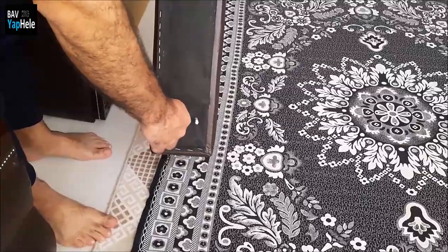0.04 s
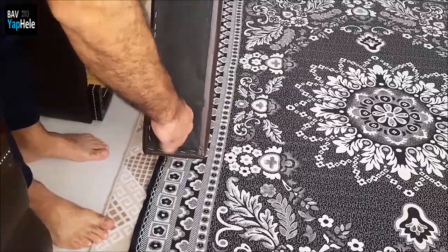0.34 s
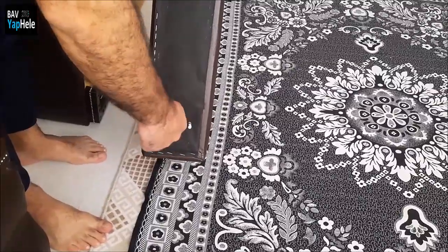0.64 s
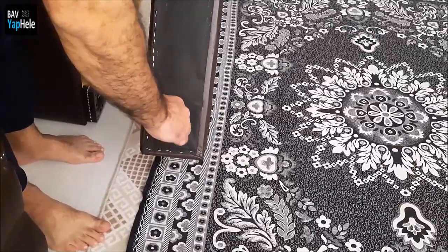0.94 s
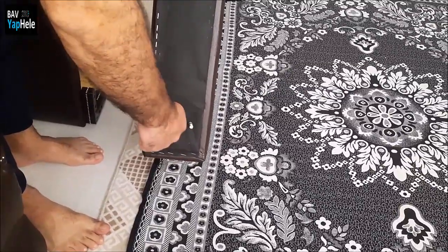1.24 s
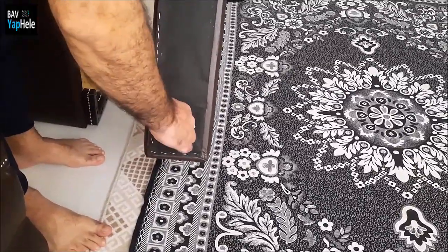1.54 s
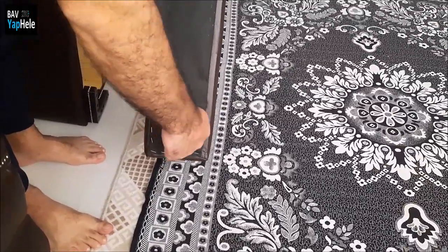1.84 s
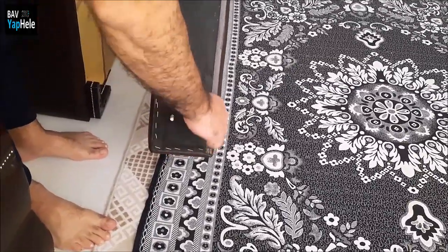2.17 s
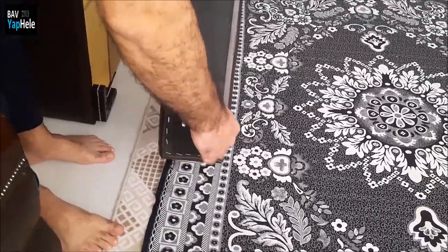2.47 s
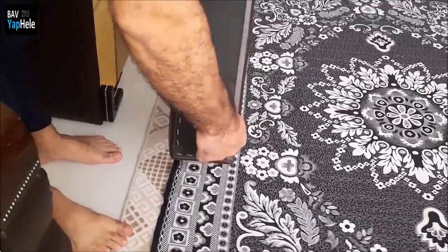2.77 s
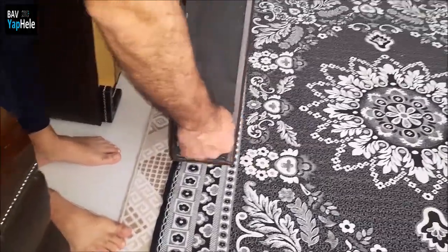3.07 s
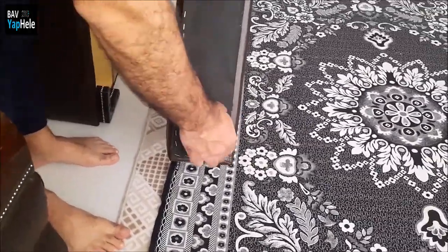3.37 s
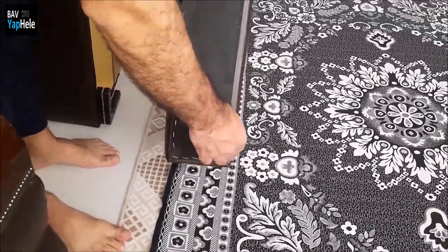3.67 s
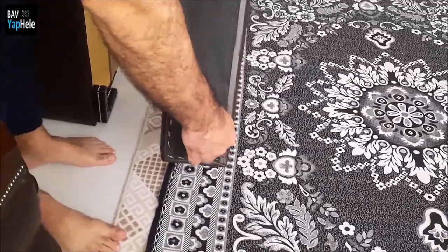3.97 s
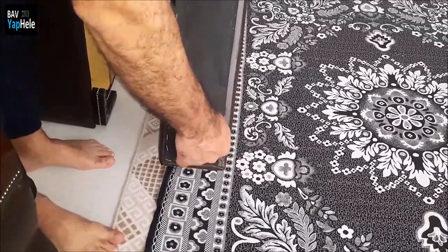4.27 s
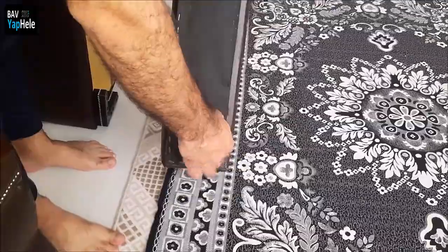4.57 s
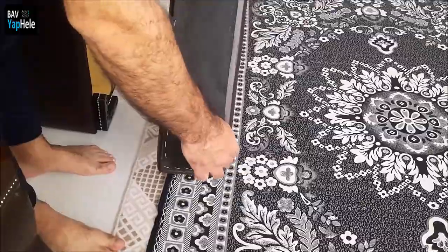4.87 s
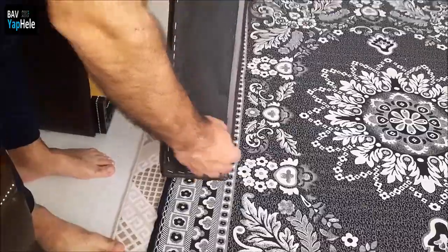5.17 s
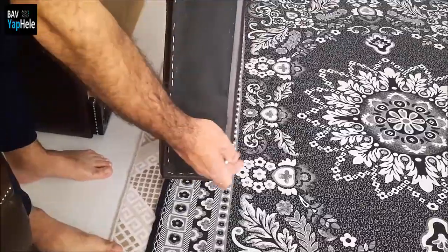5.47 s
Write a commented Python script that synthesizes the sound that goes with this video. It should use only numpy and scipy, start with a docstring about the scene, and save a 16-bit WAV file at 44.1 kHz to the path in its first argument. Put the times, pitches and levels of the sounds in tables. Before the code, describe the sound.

A detachable sofa arm is tugged loose by hand, heard from about a metre away in a small room with little echo. Light clicks and rubbing start sparsely, then build into uneven clusters of rattling clicks, short scrapes and brief hollow creaks. The sharpest knock comes just past the middle, and cushioned thuds sound as weight shifts on the frame. Quiet room air lies underneath.

```python
"""In a small living room, about a metre away, a detachable sofa arm is rocked and pulled loose by hand.
Its fittings click and chatter on impact and scrape in their slots by sliding friction. At each slip,
stick-slip motion makes the hollow panel groan and its body rub; shifting weight excites the frame's
low modes as thuds. The room reverberates for under half a second over quiet air and a faint hiss."""
import sys
import numpy as np
from scipy import signal
from scipy.fft import rfft, irfft
from scipy.io import wavfile
from scipy.ndimage import uniform_filter1d

SR = 44100
rng = np.random.default_rng(int(sys.argv[2]) if len(sys.argv) > 2 else 0)


def master_out(mix):
    """Clip the mix to full scale and print it as 16-bit PCM to the path in sys.argv[1]."""
    frames = np.transpose(np.atleast_2d(mix))
    ceiling = np.clip(frames, -1, 1)
    pcm = np.round(ceiling * 32767).astype(np.int16)
    wavfile.write(sys.argv[1], SR, pcm)


N = 247401
SIZE, TEN_MS = 8192, SR / 100  # samples in a short response; samples over which a blow's level is set

# A fitting lets go and catches again: (time [s], relative click level [dB], contact resonance [Hz],
# low-mid gain [dB], treble gain [dB], chatter decay [ms], relative groan level [dB])
SLIPS = [ (0.187, -62, 5070, -22, -3.5, 0.25, -70), (0.461, -46, 1800, -8, -6, 3.5, -39),
         (0.478, -43, 3400, -17, -7.5, 12, -47.5), (0.502, -45, 3200, -41, -5, 6, -72),
         (0.543, -54, 1290, 8, 1, 2.7, -37.5), (0.572, -42, 3330, 5, -5.5, 0.7, -43.5),
         (1.062, -61, 2400, -12, -6, 6.4, -50.5), (1.187, -74, 1000, -13, -6, 15, -54),
         (1.661, -57, 3280, -10, -20, 2.7, -42), (1.771, -84, 1000, -4, -12, 9.6, -56.5),
         (2.137, -49.5, 3600, 11, -3.5, 2.06, -42.5), (2.2559, -29, 1580, -1.5, -2.5, 5.5, -41),
         (2.4701, -30.5, 5750, -12.5, -2, 2.7, -44), (2.596, -33, 2210, -25, 1, 4.64, -38.5),
         (2.62, -32, 2840, -13, -5, 11.4, -68), (2.816, -46, 950, -3.5, -23, 6.8, -77),
         (2.861, -47.5, 990, 10.5, -5, 4, -49), (2.986, -32, 1790, -8.5, -10.5, 4.5, -44.5),
         (3.021, -31.5, 4630, 2.5, -4, 5, -40.5), (3.21, -44.5, 990, 13, -8, 3.96, -35.5),
         (3.254, -53, 910, 8, -3, 3.5, -45.5), (3.334, -25, 2170, 1.5, -2.5, 2.45, -33.5),
         (3.3745, -18.5, 1020, 0, -1.5, 4.7, -27.5), (3.613, -47.5, 910, 14, -4.5, 9.2, -41.5),
         (3.778, -41.5, 2300, 18, 4.5, 1.6, -42), (3.831, -46.5, 874, 24, 4.5, 11, -52),
         (3.860, -32, 4400, -3, -6, 8.9, -43.5), (3.927, -38.5, 3500, 16, 2, 1.83, -40),
         (4.091, -40, 945, 11, -2, 4.84, -32.5), (4.138, -71, 950, -2, -11, 13.98, -35),
         (4.171, -32, 2260, 6.5, -3, 10.2, -33.5), (4.183, -30.5, 2340, -30, -4.5, 6.35, -36),
         (4.401, -48, 2120, 14, 1, 3.6, -44), (4.427, -43, 960, 4.5, -8.5, 8.5, -51),
         (4.511, -29, 2140, -4, -7, 13, -39.5), (4.5242, -22.5, 1640, -5, -2, 6.6, -35),
         (4.676, -45, 2060, 9.5, -5.5, 12, -55), (4.7949, -30, 4400, 2, -5, 5.7, -31.5),
         (4.8146, -29, 4000, -2, -4.5, 9.5, -61), (4.910, -31, 1540, 12.5, -3.5, 3.3, -31),
         (4.9305, -29.5, 4400, 4, 1, 2.1, -62), (5.0502, -30, 1340, 4, -10.5, 7.5, -38),
         (5.147, -48, 3690, -8, 3.5, 3.45, -85), (5.3111, -34, 1990, -1.5, 5, 0.083, -74),
         (5.3521, -33, 2000, 2.5, 0.5, 0.083, -72), (5.406, -33.5, 1410, 5, -2, 0.18, -69)]


def clicks(chatter_per_ms=1.16, spot_db=6.5, spot_width=1.41):
    """Impact and rebound: one sharp contact and a dying chatter, coloured by the spot's resonance."""
    out, t = np.zeros(N), np.arange(SIZE // 2) / SR
    for s, db, hz, low_db, treble_db, chatter_ms, _ in SLIPS:
        chatter = unit(grit(len(t), spread_db=1) * np.exp(-1000 * t / chatter_ms))
        blow = chatter * chatter_per_ms * chatter_ms  # a longer chatter outweighs the first contact
        blow[0] += 1
        blow = colour(unit(blow), [(550, low_db), (1400, 0), (2400, 0), (5500, treble_db)])
        blow = colour(blow, [(hz / spot_width, 0), (hz, spot_db), (hz * spot_width, 0)])
        add(out, s, fitting(blow) * undb(db) * np.sqrt(TEN_MS))
    return out


def fitting(force):
    """Linear response: the force is convolved with the contact's crack and the panel's ringing."""
    # Modes of the panel and its fittings: (frequency [Hz], t60 [s], level [dB])
    modes = [(447.4, 0.08, -17.5), (570, 0.19, -19.5), (690, 0.2, -18), (801.2, 0.072, -10),
             (951.4, 0.063, -8), (1103, 0.11, -22.5), (1324, 0.029, -27), (1451, 0.11, -22.5),
             (1702, 0.0091, -13), (2127, 0.01, -13.5), (3166, 0.027, -25), (3500, 0.013, -25),
             (4400, 0.024, -32), (5500, 0.013, -32)]
    # Spectrum of one contact: (frequency [Hz], spectral level [dB])
    contact = [(60, -35), (200, -20.5), (400, -14), (700, 0), (1300, 3), (2100, -4.5), (2700, -7.5),
               (4200, -3.5), (6300, -8.5), (9500, -19.5), (13000, -18), (16000, -24.5)]
    ringing = ring(modes, scatter_db=3.5)  # the modes' shares vary with where the force acts
    crack = unit(colour(signal.unit_impulse(SIZE), contact))
    return signal.fftconvolve(force, unit(ringing + crack))


def scrapes(catch_db=-0.5, catch_hz=260):
    """Sliding friction: tiny slips swell and fade; the surfaces catch unevenly every few milliseconds."""
    # Longer pushes along the slot: (peak time [s], rise [s], fall [s], level [dB], treble gain [dB])
    pushes = [ (0.22, 0.091, 0.21, -75.5, -7), (0.57, 0.023, 0.011, -50.5, -9),
              (1.062, 0.021, 0.017, -69.5, -4.5), (2.14, 0.014, 0.05, -48.5, -4.5),
              (2.599, 0.029, 0.0098, -38.5, -4.5), (2.99, 0.012, 0.051, -43.5, -6),
              (3.364, 0.023, 0.0071, -34, -4), (3.761, 0.031, 0.2, -53.5, -9.5),
              (4.10, 0.041, 0.11, -49, -9), (4.186, 0.0087, 0.015, -32.5, -5.5),
              (4.932, 0.013, 0.013, -30, -1)]
    out = np.zeros(N)
    for s, rise, fall, db, treble_db in list(pushes) + slides():
        t = np.arange(-2 * rise, 2 * fall, 1 / SR)[:SR // 2]
        catches = np.interp((t - t[0]) * catch_hz, np.arange(SIZE), rng.standard_normal(SIZE))
        friction = grit(SR // 2, spread_db=6)[:len(t)] * swell(t, rise, fall)
        friction *= undb(catch_db * (catches + 1))
        force = colour(friction, [(2000, 0), (6000, treble_db)])
        add(out, s + t[0], fitting(force) * undb(db))
    return out


def slides(lag_s=0.011, rise_s=0.014, fall_s=0.1, slide_db=-17, loose_ms=1):
    """Play in a joint: a fitting slides around each click, more when loose. Gives rows for scrapes()."""
    rows = []
    for s, db, _, _, treble_db, chatter_ms, _ in SLIPS:
        looseness_db = 20 * np.log10(chatter_ms / (chatter_ms + loose_ms))
        rows.append((s + lag_s, rise_s, fall_s, db + slide_db + looseness_db, treble_db / 2 - 9.5))
    return rows


def groans(count=4, lag_ms=1.823, detune=0.0376, stutter_s=0.047, stutter_db=-8.5, gap_scatter=0.18):
    """Stick-slip: each slip sets the panel groaning, longer for a longer chatter, in a fading stutter."""
    # The panel's note, which shifts with the grip: (time [s], frequency [Hz])
    panel_pitch = [(2.6, 570), (2.98, 553.3), (3.04, 480), (3.13, 554.7), (4.4, 534.3), (4.66, 576.7),
                   (4.81, 526.2), (5.1, 583)]
    out = np.zeros(N)
    for s, *_, chatter_ms, db in SLIPS:
        half_ms = 7.574 + 0.543 * chatter_ms
        peak_s = s + (lag_ms + half_ms) / 1000
        for k, (late, sharp) in enumerate(rng.standard_normal((count, 2))):
            hz = np.interp(peak_s, *np.transpose(panel_pitch)) * (1 + detune * sharp)
            add(out, peak_s - SIZE / 2 / SR, groan(hz, half_ms) * undb(db + k * stutter_db))
            peak_s += stutter_s * (1 + gap_scatter * late)
    return out


def groan(hz, half_ms, waver=0.069, rough=0.15, skew=0.09, overtone_db=-30):
    """Friction-driven oscillation: an unsteady burst near the panel's resonance, peaking mid-way."""
    t = np.arange(-SIZE // 2, SIZE // 2) / SR
    drift, grip = signal.resample(rng.standard_normal((2, SIZE // 128)), SIZE, axis=1)
    phase = 2 * np.pi * np.cumsum(hz * (1 + waver * drift)) / SR
    tone = np.sin(phase) + undb(overtone_db) * np.sin(2 * phase)
    width_s = half_ms / 1000 * (1.024 + skew * np.sign(t))
    envelope = np.exp(-0.5 * (t / width_s) ** 2)
    return np.sqrt(2) * envelope * (1 + rough * grip) * tone


def thuds(push_s=0.008):
    """Cushioned impact: padded blows ring the heavy frame; the softer the contact, the deeper the note."""
    # Weight dropping onto the frame: (time [s], relative level [dB], peak of the force spectrum [Hz])
    blows = [(0.46, -52, 383), (0.56, -52, 111), (2.26, -57, 130), (2.602, -59.5, 130), (3.37, -46, 105),
             (3.858, -56.5, 88), (4.525, -57, 120), (4.801, -47.5, 300), (5.403, -45, 270),
             (5.412, -46, 155)]
    # The frame's low modes: (frequency [Hz], t60 [s], level [dB])
    frame_modes = [(72.6, 0.22, -15), (127, 0.12, 0), (255, .04, 1), (335, 0.07, -9)]
    out, t = np.zeros(N), np.arange(SIZE) / SR
    for s, db, hz in blows:
        push = rng.standard_normal(SIZE) * t * np.exp(-t / push_s)
        push = colour(push, [(hz / 3, -12), (hz, 0), (hz * 2, -10), (hz * 10, -40)])
        thud = unit(signal.fftconvolve(push, ring(frame_modes)))
        add(out, s, thud * undb(db) * np.sqrt(TEN_MS))
    return out


def drag(drag_db=-21, rise_s=0.014, fall_s=0.094):
    """Friction noise: the hollow body rubs on the frame at each slip; incoherent rubs add in power."""
    # Spectrum of the rubbed hollow body: (frequency [Hz], spectral level [dB])
    hollow = [(35, -16), (65, -4.5), (130, -5.5), (190, -10), (400, -1), (650, -2), (1000, -22.5),
              (3000, -43.5)]
    power, t = np.zeros(N), np.arange(-SIZE // 2, SIZE) / SR
    for s, *_, groan_db in SLIPS:
        rub = undb(groan_db + drag_db) * swell(t, rise_s, fall_s)
        add(power, s + rise_s + t[0], rub ** 2)
    return unit(colour(grit(N, spread_db=0), hollow)) * np.sqrt(N * power)


def room(wet_db=1.5, build_s=0.0027, near_db=-8, near_s=0.0023, bass_db=-3):
    """Reverberation: left and right responses of direct sound, early scatter and a diffuse tail."""
    # The room's decay by band: (frequency [Hz], t60 [s])
    decay = [(150, 0.23), (600, 0.26), (2000, 0.22), (5000, 0.23), (13000, 0.16)]
    count = SR * 2 // 3
    t, hz = np.arange(count) / SR, np.fft.rfftfreq(count, 1 / SR)
    noise, tail = rfft(diffuse(count)), 0
    for centre, t60 in decay:
        band = read([(f, float(f == centre)) for f, _ in decay], hz)
        tail = tail + irfft(noise * band, count) * np.exp(-np.log(1000) * t / t60)
    tail = unit(tail * (1 - np.exp(-t / build_s))) * undb(wet_db)
    near = unit(diffuse(count) * np.exp(-t / near_s)) * undb(near_db)  # off the floor and the arm
    response = np.array([colour(late, [(600, bass_db), (1500, 0)]) + colour(early, [(1000, 4), (6000, 5)])
                         for late, early in zip(tail, near)])
    response[0, 0] += 1
    response[1, 2] += 1  # the direct sound reaches the right two samples later
    return [even(path) for path in response]


def even(path, narrow_bins=24, wide_bins=900):
    """Equalisation: levels the noise-built response's chance peaks and dips, for an even colour."""
    power = np.abs(rfft(path)) ** 2
    ripple = uniform_filter1d(power, narrow_bins) / uniform_filter1d(power, wide_bins)
    hz = np.fft.rfftfreq(len(path), 1 / SR)
    return colour(path, np.c_[hz + 1, -10 * np.log10(ripple)])


def background(air_db=-67):
    """Diffuse ambient noise: quiet room air, with a faint high hiss for a while."""
    # Spectrum of the room air: (frequency [Hz], spectral level [dB])
    air_spectrum = [(15, -53), (25, -10), (114, -4.5), (242, -12.5), (293, -7.5), (560, -11.5), (936, -19),
                    (1370, -21.5), (2410, -25.5), (3720, -28), (6920, -30), (13200, -27.5), (14800, -23),
                    (16000, -62)]
    # The hiss coming and going: (time [s], level [dB])
    hiss_levels = [(1.33, -100), (1.42, -69), (1.65, -76.5), (1.85, -73), (2.1, -67.5), (2.801, -67.5),
                   (3.098, -100)]
    hiss_spectrum = [(2500, -12), (5000, -11), (8000, -7), (9200, -22.5)]
    air = unit(np.array([colour(side, air_spectrum) for side in diffuse(N)]))
    hiss = unit(np.array([colour(side, hiss_spectrum) for side in diffuse(N)]))
    hiss_db = np.interp(np.arange(N) / SR, *np.transpose(hiss_levels))
    return np.sqrt(N) * (air * undb(air_db) + hiss * undb(hiss_db))


def diffuse(count, coherence=0.44, spacing_m=0.14):
    """Diffuse-field coherence: noise at two points is partly alike in the bass, unrelated higher up."""
    delay_s = spacing_m / 343
    likeness = coherence * np.sinc(2 * np.fft.rfftfreq(count, 1 / SR) * delay_s)
    mid, side = rfft(rng.standard_normal((2, count)))
    mid, side = mid * np.sqrt((1 + likeness) / 2), side * np.sqrt((1 - likeness) / 2)
    return irfft(np.array([mid + side, mid - side]), count)


def ring(modes, scatter_db=0):
    """Modal superposition: a blow's response is a sum of exponentially decaying sinusoids."""
    hz, t60, db = np.transpose(modes)[:, :, None]
    t = np.arange(SIZE) / SR
    partials = unit(np.cos(2 * np.pi * hz * t) * np.exp(-np.log(1000) * t / t60))
    return np.sum(undb(db + scatter_db * rng.standard_normal(db.shape)) * partials, axis=0)


def grit(count, spread_db):
    """Microslip: dense tiny slips of uneven size, rms 1."""
    slips = rng.standard_normal(count) * undb(spread_db * np.minimum(rng.exponential(size=count), np.pi))
    return unit(slips) * np.sqrt(count)


def swell(t, rise_s, fall_s):
    """Asymmetric Gaussian envelope, peaking at t = 0."""
    return np.exp(-(t / np.where(t < 0, rise_s, fall_s)) ** 2)


def colour(x, points):
    """Minimum-phase filter through (frequency [Hz], gain [dB]) points, by folding the cepstrum."""
    gain = undb(read(points, np.fft.rfftfreq(SIZE, 1 / SR)))
    cepstrum = irfft(np.log(gain))
    cepstrum[1:SIZE // 2] *= 2
    cepstrum[SIZE // 2 + 1:] = 0
    return signal.fftconvolve(x, irfft(np.exp(rfft(cepstrum))))[:len(x)]


def read(points, hz):
    """Interpolation of (frequency [Hz], value) points on a logarithmic axis."""
    f, value = np.transpose(points)
    return np.interp(np.log(hz + 1), np.log(f), value)


def add(track, s, sound):
    """Superposition of a sound on a track from time s."""
    start = max(int(s * SR), 0)
    part = sound[:max(N - start, 0)]
    track[start:start + len(part)] += part


def undb(db):
    """Decibels to amplitude ratio."""
    return 10 ** (np.asarray(db) / 20)


def unit(x):
    """Normalisation to unit energy."""
    return x / np.sqrt(np.sum(x ** 2, axis=-1, keepdims=True))


def scene():
    """A point source: all the arm's sounds share the same two paths through the room."""
    # Level difference between the two microphone ports: (frequency [Hz], left minus right [dB])
    ports = [(100, 3.5), (400, 3.1), (1000, 4), (2000, 1.2), (4000, -6.5), (8000, -3.5), (13000, -8)]
    arm = undb(-5) * clicks() + scrapes() + undb(-2.5) * groans() + undb(2.5) * thuds() + drag()
    heard = []
    for sign, path in zip((1, -1), room()):
        reverberant = signal.fftconvolve(arm, path)[:N]
        heard.append(colour(reverberant, [(hz, sign * db / 2) for hz, db in ports]))
    return np.array(heard) + background()


def record(dry):
    """Band limiting: a steep elliptic low-pass cuts the treble above 16 kHz."""
    return signal.sosfilt(signal.ellip(10, 0.2, 70, 16000, fs=SR, output="sos"), dry)


dry = scene()
out = record(dry)
master_out(out)
```